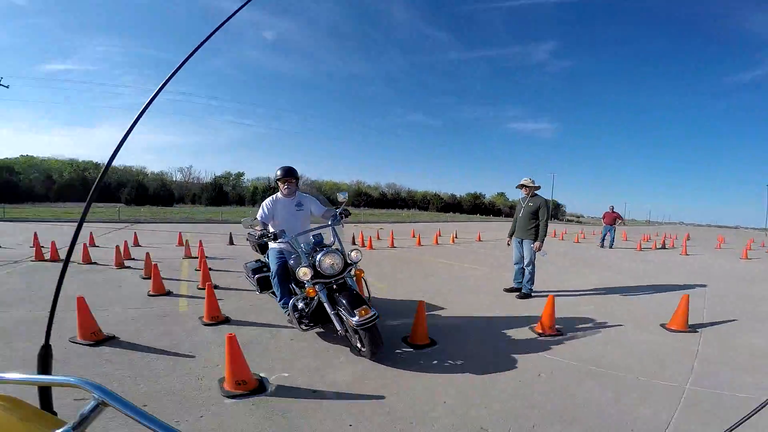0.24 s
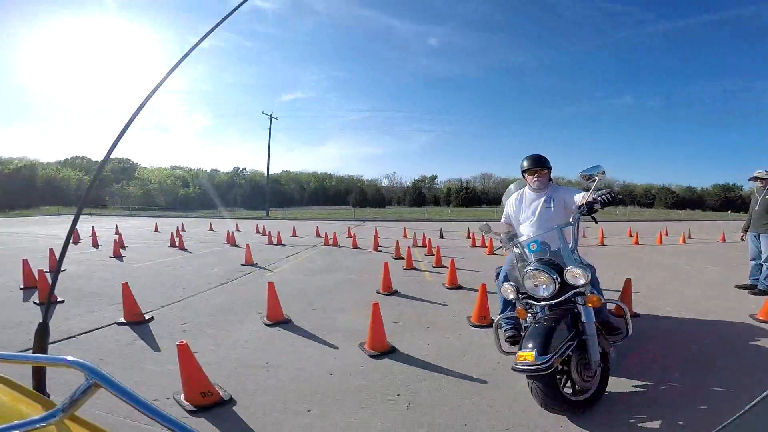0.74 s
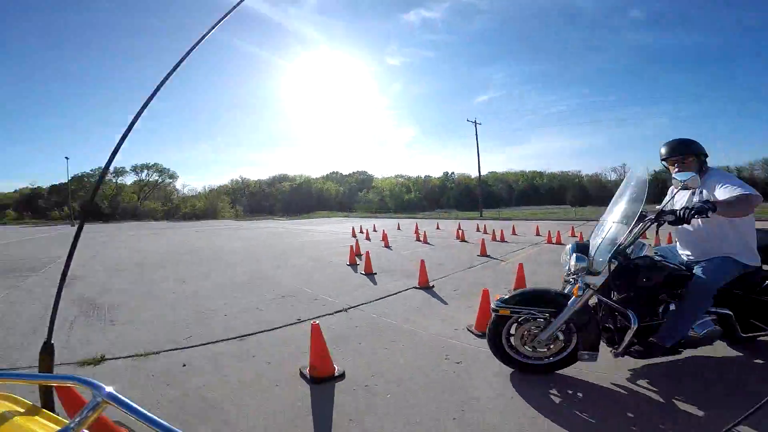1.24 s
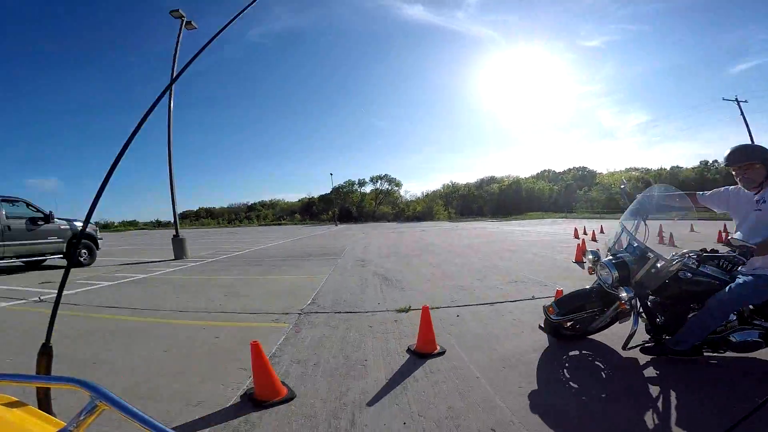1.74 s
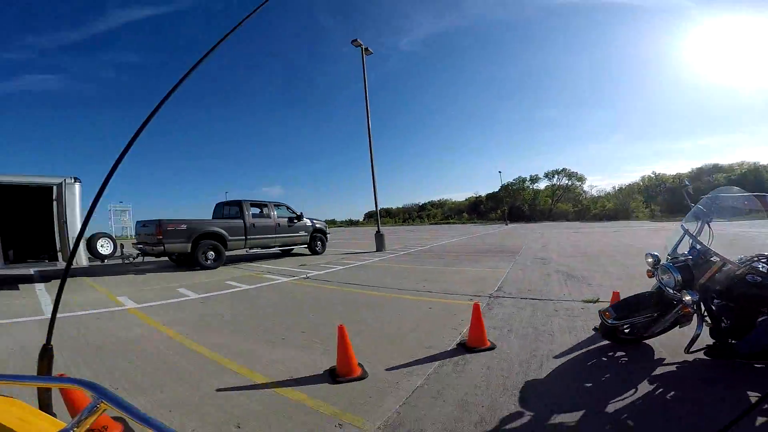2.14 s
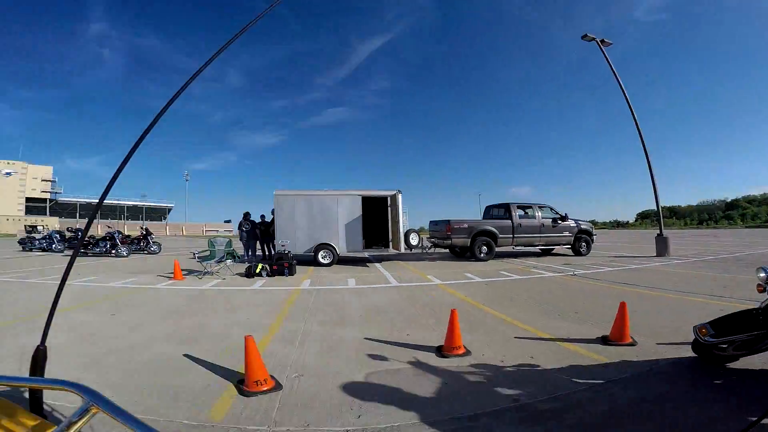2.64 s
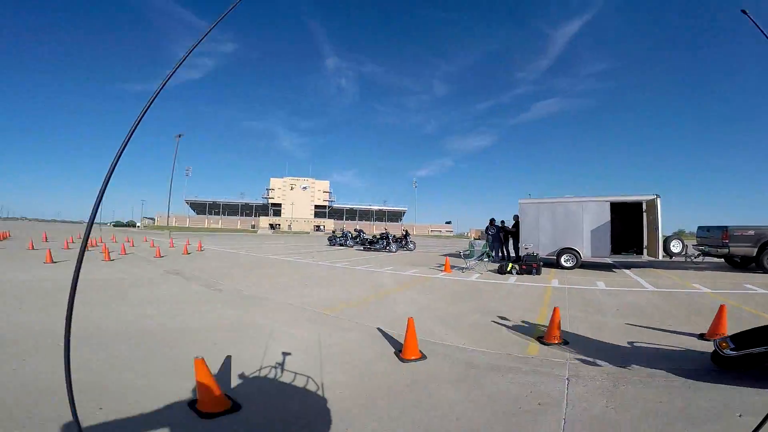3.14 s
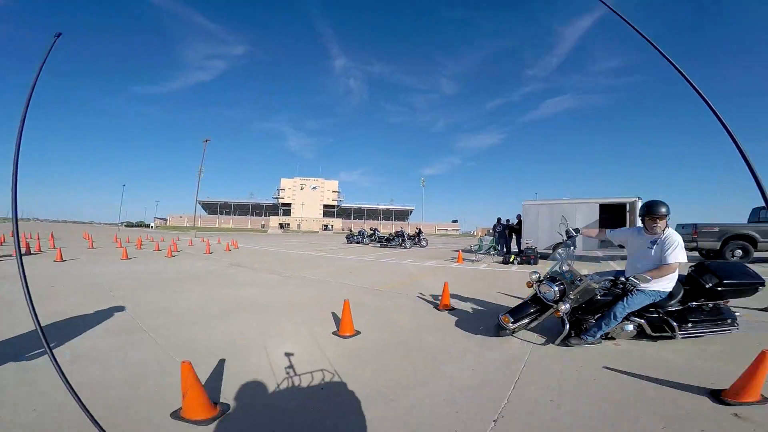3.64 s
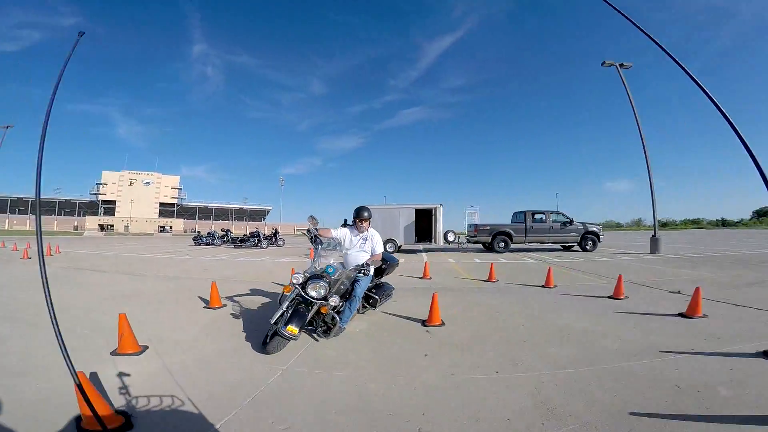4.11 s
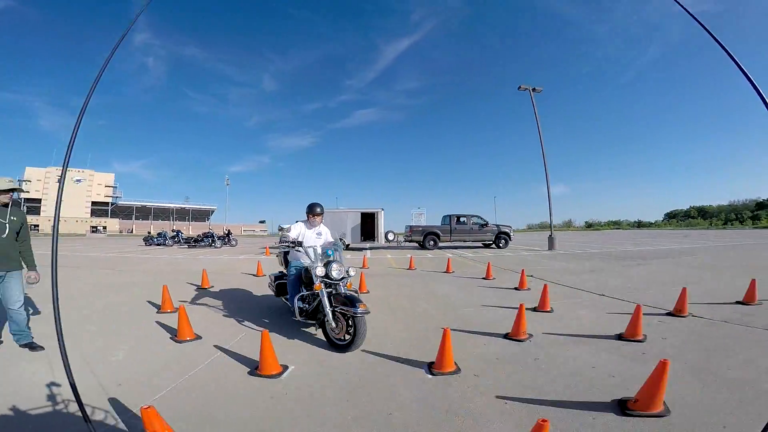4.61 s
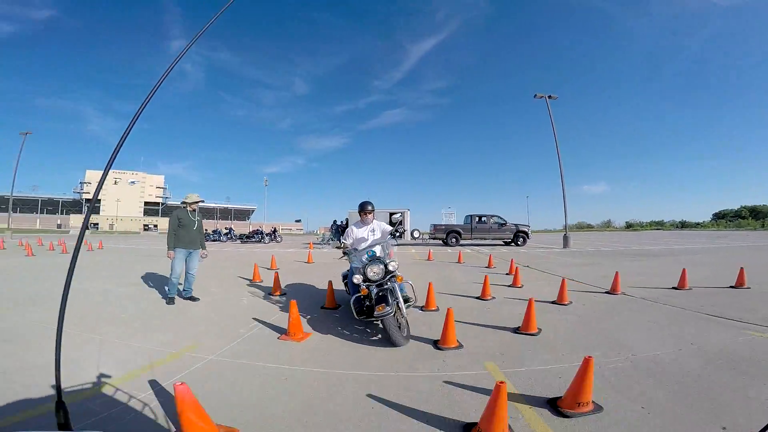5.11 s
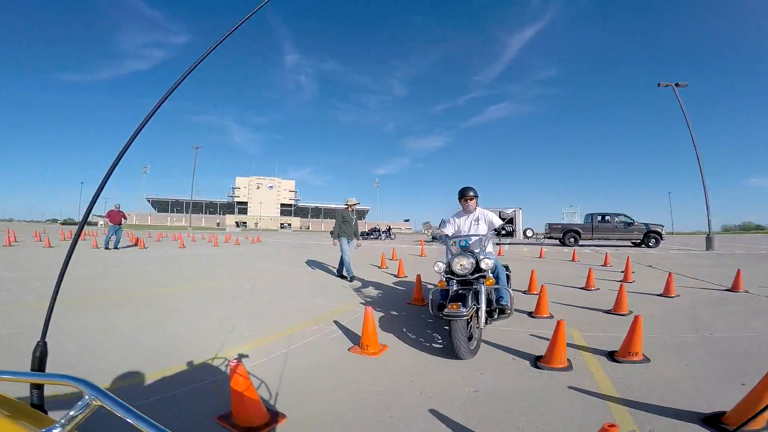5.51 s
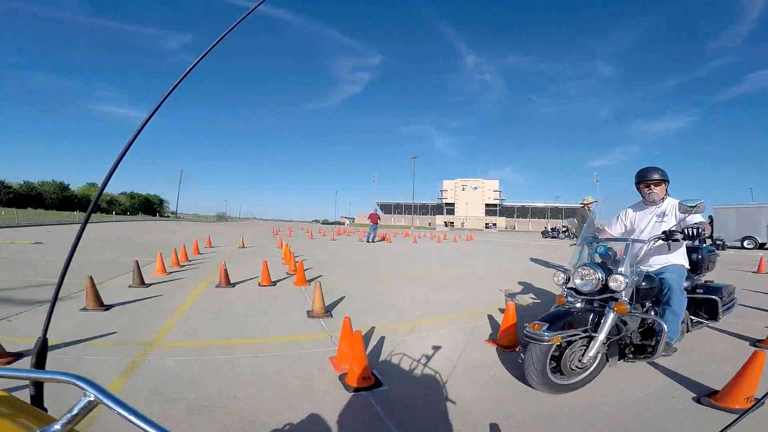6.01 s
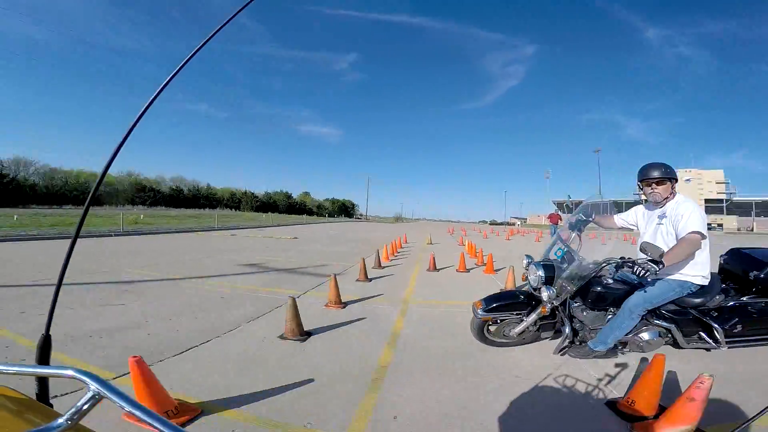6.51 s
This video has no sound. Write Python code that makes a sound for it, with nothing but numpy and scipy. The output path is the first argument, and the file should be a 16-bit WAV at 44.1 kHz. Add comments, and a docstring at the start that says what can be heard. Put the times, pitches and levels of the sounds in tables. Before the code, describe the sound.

Outdoors on a wide paved lot, two big twin-cylinder motorcycles run throughout at crawling speed, heard closely in one channel. From 0 s their uneven low thumps overlap: one round and deep with a hollow silencer bark, the other harder, with dry rasp, gear clatter and metallic valve ticks. The deep one quickens until about 1.2 s, then sags to slow, heavy thuds by 2.3 s. A tiny high squeak passes at 1.25 s. The sharp engine climbs and blips at 1.8-2 s with a brief gassy blast that fades quickly; a flat, faint air-like hiss runs from 1.8 to 2.75 s. Around 2.7-4 s the sharp exhaust turns toward the listener, chuffing with a slightly ringing edge. From 4.3 to 5 s wind rumbles and softly slaps the microphone while the deep engine surges and dips. Both pick up around 5.5 s, then ease slightly, still thumping at 6.7 s.

```python
"""Uneven thumping of two big V-twin motorcycles crawling round a car park, one sharp, one deep.
Firing clicks excite exhaust filters and pipe echoes; noise swelling with the firings makes rasp,
chuff, bark and valve ticks. Filtered noise gives gear clatter, wind buffets and slaps, and, for
about a second, a flat hiss like escaping air. Short fading tones make a squeak and ringing valve ticks."""
import sys
import numpy as np
from scipy import signal
from scipy.fft import rfft, irfft
from scipy.io import wavfile
from scipy.ndimage import uniform_filter1d

SR = 44100
rng = np.random.default_rng(int(sys.argv[2]) if len(sys.argv) > 2 else 0)


def int16_out(signal):
    """Quantize to a 16-bit WAV file."""
    q = np.round(np.clip(np.atleast_2d(signal).T, -1, 1) * 32767)
    wavfile.write(sys.argv[1], SR, q.astype(np.int16))


def boost_factor(decibels):
    """Convert a level in decibels to a linear amplitude factor."""
    exponent = np.asarray(decibels, float) / 20
    return 10 ** exponent


N = 297675

# wind rumble, puff and slap spectra: freq_hz, gain_db
WIND_SPECTRUM = [(12, -30), (30, -2), (50, -39), (100, -10), (180, -15.5), (300, -24), (600, -55),
                 (2000, -90)]
PUFF_SPECTRUM = [(60, -20), (200, -8), (350, -6), (600, -12.5), (850, -15), (1300, -42), (4000, -71)]
SLAP_SPECTRUM = [(100, -25), (250, -12), (420, 6.5), (700, 2), (1100, -14), (2000, -17.5), (5000, -47)]
# rumble level: time_s, level_db
WIND_LEVEL = [(0, -36), (1.1, -26), (1.35, -19), (2.3, -28.5), (3.5, -28), (4.1, -26.5), (4.5, -20.5),
              (5, -22.5), (5.5, -34), (6.75, -32)]
# brighter puffs of wind: centre_s, level_db, half_length_s (to 1/e)
WIND_PUFFS = [(2.807, -32, 0.064), (3.46, -31.5, 0.14), (4.39, -26, 0.012), (4.45, -23, 0.011),
              (4.622, -33, 0.15), (4.826, -31.5, 0.031), (5.038, -29, 0.078)]
# wind slapping the microphone: start_s, relative_db
WIND_SLAPS = [(4.334, -19), (4.38, -14.5), (4.408, -28), (4.432, -17), (4.467, -18.5), (4.585, -15),
              (4.621, -16), (4.823, -29), (4.867, -22), (4.905, -21), (4.994, -17)]
# flat hiss: freq_hz, gain_db
HISS_SPECTRUM = [(1000, -14), (3000, 4), (6000, 0.5), (10000, 2.5), (14000, 2.5), (17000, -1.5)]
# ringing valve ticks, short and pitched, at listed times: start_s, relative_db, pitch_hz
VALVE_PINGS = [(0.3046, -36, 3670), (0.3864, -37, 3330), (0.419, -30, 3150), (0.442, -28, 3150),
               (0.5284, -31, 3760), (0.581, -26.5, 3740), (0.7446, -32, 3770), (0.798, -26.5, 3570),
               (0.8509, -32, 3770), (0.904, -32, 3860), (1.851, -25, 4050), (1.873, -31, 4050),
               (1.89, -27, 4050), (1.95, -31, 3900), (2.895, -28, 4200), (2.947, -29, 4900),
               (3.24, -28, 4850), (3.27, -30, 4500)]

# deep engine speed: time_s, cycles_hz
DEEP_SPEED_HZ = [(0.0, 16.1), (0.45, 16.71), (0.75, 18.35), (1.2, 19.41), (1.5, 16.16), (1.8, 13.65),
                 (2.25, 12.55), (2.55, 12.35), (3.45, 12.56), (3.75, 13.48), (4.2, 14.38), (4.5, 16.57),
                 (4.95, 12.64), (5.1, 13.93), (5.4, 18.24), (5.55, 18.55), (6.15, 17.69), (6.75, 15.68)]
# deep engine as heard: time_s, exhaust_db, silencer_shell_db
DEEP_LEVELS = [(0, -17.5, -30.5), (.25, -15, -32.5), (.75, -15, -34), (1, -16.5, -31), (1.5, -17, -31.5),
               (1.75, -16, -30), (2, -26, -34), (2.25, -19.5, -31.5), (2.5, -15.5, -38.5), (2.75, -17, -32),
               (3, -17.5, -33.5), (3.5, -17, -30.5), (4.2, -15.5, -34.5), (4.6, -18.5, -35.5),
               (5.002, -16.5, -41.5), (5.25, -16, -35), (5.75, -15.5, -34), (6.75, -16.5, -34)]
# deep exhaust response, shell bark, gas growl: freq_hz, gain_db
DEEP_EXHAUST = [(20, -43.5), (35, -25), (60, 12), (85, 10), (115, 5), (135, -1), (165, -17), (250, -15.5),
                (400, -26), (600, -44.5), (800, -58), (1500, -70), (4000, -110)]
BARK_SPECTRUM = [(300, -42.5), (450, -5), (540, 2), (610, 4), (720, -1), (850, -14), (1200, -23.5),
                 (4000, -100)]
GROWL_SPECTRUM = [(220, -29), (350, -1), (450, -3), (600, -5.5), (750, -12), (950, -22), (1600, -21.5),
                  (4000, -88)]

# sharp engine speed: time_s, cycles_hz
SHARP_SPEED_HZ = [(0.0, 17.46), (0.3, 17.63), (0.9, 19.06), (1.35, 21.03), (1.65, 23.7), (1.8, 24.0),
                  (1.97, 27.3), (2.12, 27.4), (2.55, 21.37), (2.7, 19.88), (3.0, 18.74), (3.6, 18.1),
                  (4.5, 20.02), (4.65, 19.85), (4.95, 16.91), (5.1, 16.34), (5.7, 20.45), (6.0, 21.03),
                  (6.75, 18.59)]
# sharp engine as heard while the machines circle: time_s, exhaust_db, engine_block_db
SHARP_LEVELS = [(0, -18, -48.5), (.45, -20, -46), (.88, -17, -45), (1.0, -16.5, -49.5), (1.3, -16, -43.5),
                (1.7, -19.5, -43), (2, -17.5, -47), (2.3, -21.5, -45), (2.8, -17, -44.5), (3.3, -17, -47.5),
                (3.75, -20.5, -47), (4.27, -18, -45), (4.7, -21, -52), (5, -19, -50), (5.25, -17.5, -46),
                (5.75, -18, -47), (6.4, -16.5, -45), (6.75, -16, -43.5)]
# how squarely second pipe and cylinder heads face the listener, second head over first:
# time_s, pipe_0_to_1, heads_0_to_1, second_head_db
SHARP_FACING = [(0, 0.02, 0.72, 3.5), (.9, 0.52, 1, 1.5), (1.7, 0.54, 0.68, 3), (2.2, 0.52, 0.2, 10.5),
                (2.5, 0.6, 0.48, 5), (2.9, 0.99, 0.86, 9.5), (3.3, 0.84, 0.78, 8.5), (3.8, 0.85, 0.69, 8),
                (4.35, 0.68, 0.52, 10), (4.7, 0.45, 0.93, 0), (5.2, 0, 0.9, 7), (5.5, 0.47, 0.83, 0.5),
                (6.75, 0.52, 0.87, 1.5)]
# sharp exhaust response, throttle blast, rasp, chuff: freq_hz, gain_db
SHARP_EXHAUST = [(20, -73), (40, 0.5), (60, 4), (85, 4), (130, 0), (170, 3), (250, -3), (330, -5.5),
                 (400, -9), (480, -25), (700, -27), (1500, -54.5), (4000, -110)]
BLAST_SPECTRUM = [(150, -31.5), (300, 0), (450, 1), (900, -3), (1500, -12), (2500, -15), (4000, -22),
                  (7000, -29.5), (12000, -54)]
RASP_SPECTRUM = [(500, -33.5), (800, 5), (1000, 5), (1300, 1), (1900, -2.5), (2400, -8.5), (3500, -46),
                 (8000, -83)]
CHUFF_SPECTRUM = [(700, -32), (1050, -15), (1200, 9), (1330, -2), (1470, 2.5), (1750, -10.5), (2500, -11.5),
                  (3300, -12), (5000, -36), (9000, -103)]
# second pipe's wall modes: pitch_hz, relative_db, t60_s
WALL_MODES = [(1150, -4, .022), (1278, 3.5, 0.014), (1460, -1.5, 0.029), (1740, -9, .014)]
# clatter and ticks, gear whirr, hard valve clack: freq_hz, gain_db
CLATTER_SPECTRUM = [(1500, -24.5), (2300, 2.5), (3100, 2.5), (3500, 1), (5000, -1), (7000, -7),
                    (10000, -15.5), (14000, -22.5), (17000, -34)]
WHIRR_SPECTRUM = [(2000, -55), (2850, -14.5), (3050, -1), (3250, -34), (4500, -72), (9000, -100)]
CLACK_SPECTRUM = [(600, -17), (1200, 2), (1600, 8.5), (2500, -10), (4500, -7), (7000, -16), (11000, -19),
                  (16000, -45)]
# hardest valve clacks: start_s, relative_db
VALVE_CLACKS = [(0.021, -27.5), (0.0782, -23.5), (0.19, -25), (0.3058, -24), (0.417, -29), (2.9464, -31),
                (3.376, -40), (4.9631, -27), (5.0832, -26), (5.145, -29), (5.173, -29), (5.205, -27),
                (5.232, -36), (5.263, -30), (5.288, -31)]

# firing places, in turns of the cycle
DEEP_FIRES = np.array([.0595, .486])
SHARP_FIRES = np.array([.374, .804])
CRAWL_HZ = 20.34  # reference speed for the sharp exhaust's edge


def level(x):
    """Scale to rms 1."""
    return x / np.sqrt(np.mean(x ** 2))


def noise():
    """White noise of unit variance."""
    return rng.standard_normal(N)


def curves(t, table):
    """Table columns interpolated at every sample."""
    time_s, *columns = np.transpose(table)
    return [np.interp(t, time_s, column) for column in columns]


def colour(x, points, size=8192):
    """Causal minimum-phase filter through (Hz, dB) points, via the folded cepstrum."""
    hz, db = np.transpose(points)
    grid_hz = np.maximum(np.fft.rfftfreq(size, 1 / SR), 1)
    gain_db = np.interp(np.log(grid_hz), np.log(hz), db)
    cepstrum = irfft(np.log(boost_factor(gain_db)))
    cepstrum[1:size // 2] *= 2
    cepstrum[size // 2 + 1:] = 0
    response = irfft(np.exp(rfft(cepstrum)))
    return signal.fftconvolve(x, response)[:N]


def tilt(x, split_hz, low_db, high_db):
    """Separate gains below and above a zero-phase corner."""
    low = signal.sosfiltfilt(signal.butter(2, split_hz, fs=SR, output="sos"), x)
    return boost_factor(low_db) * low + boost_factor(high_db) * (x - low)


def walk(rate_hz):
    """Random levels held 1 / rate_hz and smoothed twice."""
    hold = int(SR / rate_hz)
    steps = np.repeat(rng.standard_normal(N // hold + 1), hold)
    return uniform_filter1d(uniform_filter1d(steps, hold), hold)[:N]


def early(x, lead_s):
    """Advance by a fixed time."""
    lead = int(lead_s * SR)
    return np.pad(x[lead:], (0, lead), mode="reflect")


def clicks(hz, places, odd_db, scatter_db, jitter_s, count=200):
    """One click per place per cycle, scattered in size and moment; odd_db lifts every other click."""
    turns = np.cumsum(hz) / SR
    at = (np.arange(count)[:, None] + np.array(places)).ravel()
    jitter, scatter = rng.standard_normal((len(at), 2)).T
    sample = np.interp(at, turns, np.arange(N), -N, 2 * N) + jitter_s * SR * jitter
    sample = sample.astype(int)
    odd_db = np.broadcast_to(odd_db, N)[np.clip(sample, 0, N - 1)]
    gain = boost_factor(odd_db * (np.arange(len(at)) % 2) + scatter_db * scatter)
    inside = (sample >= 0) & (sample < N)
    return np.bincount(sample[inside], gain[inside], N)


def puffs(train, rise_s, fall_s, steady):
    """Noise that swells and fades at each click, over a steady share."""
    age = np.arange(int(.06 * SR)) / SR
    shape = np.exp(-age / fall_s) - np.exp(-age / min(rise_s, .9 * fall_s))
    swell = signal.fftconvolve(train, shape / shape.max())[:N]
    return (abs(steady) + swell) * noise()


def blows(table, points, rise_s, fall_s):
    """Short coloured noise burst at each (s, dB) row."""
    time_s, db = np.transpose(table)
    unit = np.sqrt(np.mean(colour(noise(), points) ** 2))
    train = np.bincount((time_s * SR).astype(int), boost_factor(db), N)
    return colour(puffs(train, rise_s, fall_s, 0), points) / unit


def ring(t, start_s, hz, db, t60_s, rise_s):
    """One short tone, linear rise, exponential fade."""
    age = np.maximum(t - start_s, 0)
    envelope = boost_factor(db - 60 * age / t60_s) * np.minimum(age / rise_s, 1)
    return envelope * np.sin(2 * np.pi * hz * age)


def pipe(train, round_trip_s, keep, smear_s, count=5):
    """Pulses run up and down a pipe, scaled by keep and blunted by smear_s on every round trip."""
    total = 0
    for k in range(count):
        delayed = np.roll(train, int(k * round_trip_s * SR))
        total = total + keep ** k * uniform_filter1d(delayed, 1 + int(k * smear_s * SR))
    return total


def wind(t):
    """Turbulence at the microphone: lumpy low rumble, brighter puffs, sharp slaps."""
    rumble = level(colour(boost_factor(3.1 * walk(13)) * noise(), WIND_SPECTRUM))
    swell = sum(boost_factor(db) * np.exp(-((t - s) / length) ** 2) for s, db, length in WIND_PUFFS)
    puff = swell * level(colour(noise(), PUFF_SPECTRUM))
    slaps = boost_factor(-6.0) * blows(WIND_SLAPS, SLAP_SPECTRUM, 0.00075, 0.0037)
    rumble_db, = curves(t, WIND_LEVEL)
    return boost_factor(rumble_db) * rumble + puff + slaps


def hiss(t):
    """Smooth flat noise, gated abruptly on and off."""
    start_s, stop_s, edge_s = 1.83, 2.745, .035
    gate = np.clip(np.minimum(t - start_s, stop_s - t) / edge_s + .5, 0, 1)
    return boost_factor(-43) * gate ** 2 * level(colour(noise(), HISS_SPECTRUM))


def squeak(t):
    """Tiny high squeak, one fading tone."""
    return ring(t, 1.247, 13750, -56, t60_s=.04, rise_s=.004)


def deep_thump(hz):
    """Round pressure pulses ring in a big silencer; the lowest notes grow as speed falls."""
    train = pipe(clicks(hz, DEEP_FIRES, 0, 0.45, .0001), 0.00985, 0.2, 0.0004)
    # fixed time lead: the thump sits later in a slow cycle
    thump = early(colour(train, DEEP_EXHAUST), .0083)
    # slower strokes push longer
    return level(tilt(thump, 43, 2.0 * (16.5 - hz), 0))


def deep_bark(hz, thump_db):
    """Gas pulses and pipe echoes ring the silencer shell under load; off load the gas growls."""
    gas = pipe(clicks(hz, DEEP_FIRES - .13, -0.97, 1.5, .0005), 0.0105, 0.6, 0.0007)
    growl = level(colour(puffs(gas, 0.0015, 0.0097, 0.6), GROWL_SPECTRUM))
    # gas keeps the shell droning between blows
    drone = level(colour(puffs(gas, 0.0029, 0.0071, 0.6), BARK_SPECTRUM))
    struck = level(colour(gas, BARK_SPECTRUM))
    load = np.clip((thump_db + 19) / 5, 0, 1)
    bark = load * (1.15 * struck + .45 * drone) + (1 - .62 * load) * growl
    # brightens with the revs
    return tilt(bark, 530, -.9 * (hz - 17.5), 0.87 * (hz - 17.5))


def deep_engine(t):
    """Deep V-twin: exhaust thump plus silencer-shell bark."""
    hz, = curves(t, DEEP_SPEED_HZ)
    thump_db, bark_db = curves(t, DEEP_LEVELS)
    return boost_factor(thump_db) * deep_thump(hz) + boost_factor(bark_db) * deep_bark(hz, thump_db)


def sharp_thump(hz, facing):
    """Short hard pulses from two pipes with echoes; revs and facing lift the sharp edge."""
    first = clicks(hz, [.374], 0, 1.2, .0001)
    # shorter second pipe: fixed time lead, so the gap narrows at speed
    other = early(clicks(hz, [.85], 0, 1.2, .0001), .0024)
    body = colour(pipe(first + boost_factor(.7) * other, 0.01245, 0.35, 0.0021), SHARP_EXHAUST)
    # echoes drown in the rush of gas at speed; inverted along the first pipe, upright along the other
    first_echo = np.clip(.35 - 0.054 * (hz - CRAWL_HZ), .05, .6)
    other_echo = np.clip(.42 - .09 * (hz - 23.5), .08, .45)
    edge = pipe(first, .0099, -first_echo, .00047)
    edge = edge + boost_factor(-2.5) * pipe(other, .0113, other_echo, .0004, count=3)
    edge = colour(early(edge, .001), SHARP_EXHAUST)
    edge_db = np.minimum(-8 + 2 * (hz - CRAWL_HZ) + 11 * facing, 4.5)
    return tilt(body, 202, 0, -np.inf) + tilt(edge, 164, -np.inf, edge_db)


def throttle_blast(t, hz):
    """A blip of throttle blows a burst of gas with each firing."""
    opens_s, shuts_s, rest_db = 1.8, 1.98, -52
    blast_db = -26.5 - 64 * np.maximum(t - shuts_s, 0)  # falls 64 dB/s
    blast_db = blast_db - 3000 * np.maximum(opens_s - t, 0)  # opens within 10 ms
    gas = puffs(clicks(hz, SHARP_FIRES - .03, 4.7, 0.92, .0005), 0.0011, 0.0039, 0.69)
    return boost_factor(np.maximum(blast_db, rest_db)) * level(colour(gas, BLAST_SPECTRUM))


def rasp(hz, odd_db):
    """Gas noise swelling with firings and their pipe echoes."""
    gas = clicks(hz, SHARP_FIRES - .04, odd_db - 0.5, 4.1, 0.0005)
    gas = pipe(gas, 0.0092, 0.33, .001)
    return level(colour(puffs(gas, 0.00049, 0.0037, 0.95), RASP_SPECTRUM))


def chuff(t, hz):
    """Gas puffs, mostly from the second pipe, with its wall ringing in a few modes."""
    places, odd_db = SHARP_FIRES - .058, 16.0
    gas = puffs(clicks(hz, places, odd_db, .8, .0003), 0.003, 0.004, 0.04)
    age = t[:int(.04 * SR)]
    wall = 0
    for mode_hz, db, t60_s in WALL_MODES:
        # each mode is struck a little differently at every blow
        struck = clicks(hz, places, odd_db, 1.8, .0003)
        mode = age * boost_factor(-60 * age / t60_s) * np.sin(2 * np.pi * mode_hz * age) / t60_s
        wall = wall + boost_factor(db) * signal.fftconvolve(struck, mode)[:N]
    return level(level(colour(gas, CHUFF_SPECTRUM)) + 1.3 * level(wall))


def tick_noise(hz, odd_db):
    """Valves bounce on their seats: noise puffs with three decaying strikes."""
    strikes = pipe(clicks(hz, SHARP_FIRES - .04, odd_db, 2.2, 0.00046), 0.0047, 0.45, 0, count=3)
    return colour(puffs(strikes, 0.002, 0.003, 0.1), CLATTER_SPECTRUM)


def valve_ticks(hz, odd_db):
    """Valve ticks whose shrill part, above 5500 Hz, varies on its own."""
    low, high = tick_noise(hz, odd_db), tick_noise(hz, odd_db)
    split = signal.butter(2, 5500, fs=SR, output="sos")
    return level(signal.sosfilt(split, low - high) + high)


def valve_pings(t):
    """Ringing valve ticks: one short pitched tone per table row."""
    return sum(ring(t, s, hz, db + 8.5, t60_s=0.0063, rise_s=0.001) for s, db, hz in VALVE_PINGS)


def engine_block(hz, block_db, heads, odd_db):
    """Gear clatter, a narrow gear whirr rising with speed, valve ticks and hard clacks."""
    clatter = level(colour(boost_factor(0.25 * walk(30)) * noise(), CLATTER_SPECTRUM))
    whirr = level(colour(noise(), WHIRR_SPECTRUM))
    whirr_db = block_db - 14.0 + 3.0 * np.clip(hz - 19.5, -4, 2)
    tick_db = block_db - 12 + 13 * heads
    clacks = boost_factor(-7.5) * blows(VALVE_CLACKS, CLACK_SPECTRUM, 0.001, 0.0025)
    ticks = boost_factor(tick_db) * valve_ticks(hz, odd_db)
    return boost_factor(block_db) * clatter + boost_factor(whirr_db) * whirr + ticks + clacks


def sharp_engine(t):
    """Sharp V-twin: exhaust thump, gas noises just ahead of the firings, engine block, valve pings."""
    hz, = curves(t, SHARP_SPEED_HZ)
    thump_db, block_db = curves(t, SHARP_LEVELS)
    facing, heads, odd_db = curves(t, SHARP_FACING)
    exhaust = boost_factor(thump_db) * level(sharp_thump(hz, facing)) + throttle_blast(t, hz)
    gas = boost_factor(block_db + 6.5) * rasp(hz, odd_db)
    # facing the second pipe brings out the chuff
    gas = gas + boost_factor(-65.5 + 29.5 * facing) * chuff(t, hz)
    return exhaust + gas + engine_block(hz, block_db, heads, odd_db) + valve_pings(t)


def scene():
    """Wind, hiss, squeak and both engines, one channel."""
    t = np.arange(N) / SR
    background = wind(t) + hiss(t) + squeak(t)
    return (background + deep_engine(t) + sharp_engine(t))[None]


def roll_off(x):
    """The treble ends steeply here."""
    return signal.sosfilt(signal.butter(12, 15670, fs=SR, output="sos"), x)


def record(dry):
    """Soft saturation rounds the loudest peaks."""
    mix = np.tanh(0.62 * dry) / 0.54
    return roll_off(mix)


dry = scene()
out = record(dry)
int16_out(out)
```